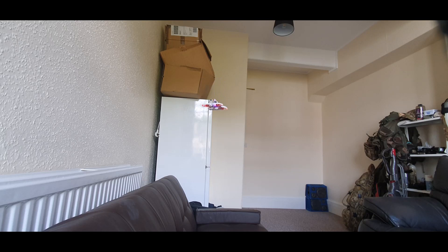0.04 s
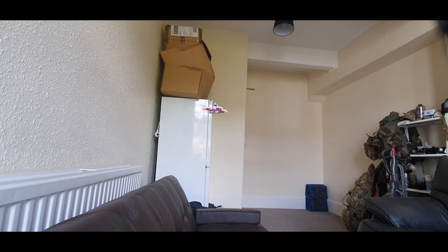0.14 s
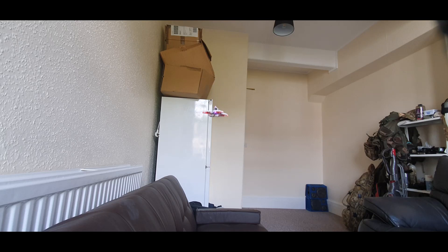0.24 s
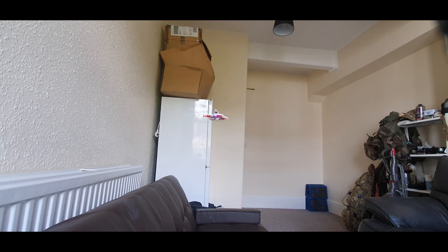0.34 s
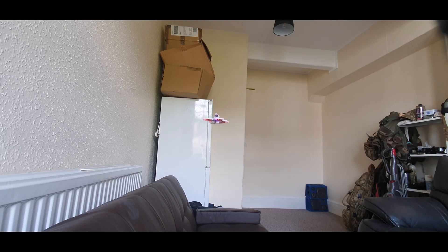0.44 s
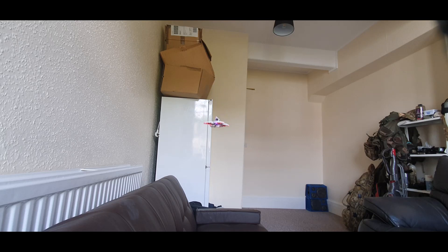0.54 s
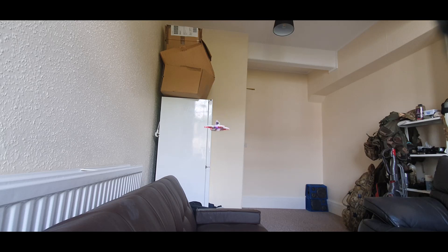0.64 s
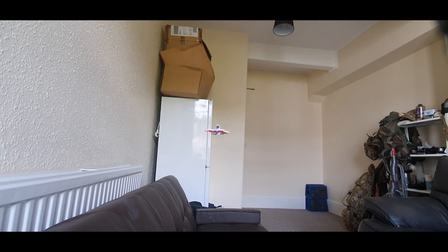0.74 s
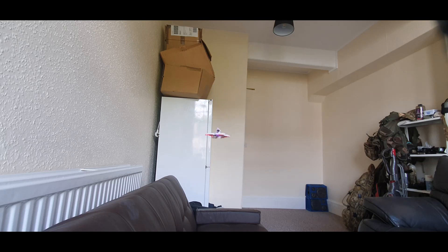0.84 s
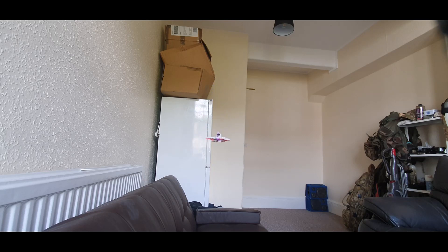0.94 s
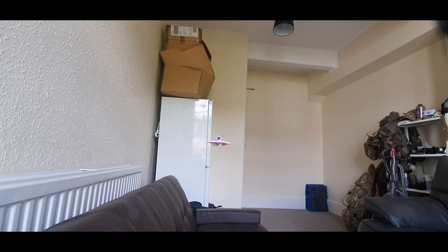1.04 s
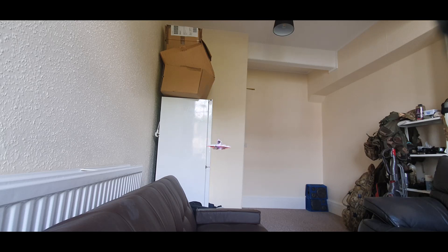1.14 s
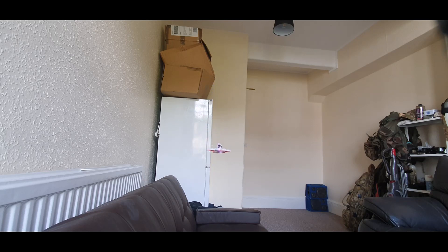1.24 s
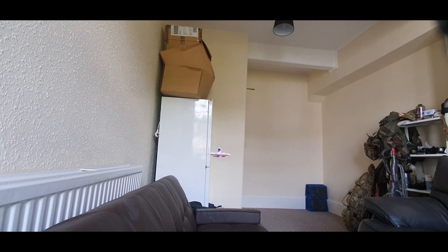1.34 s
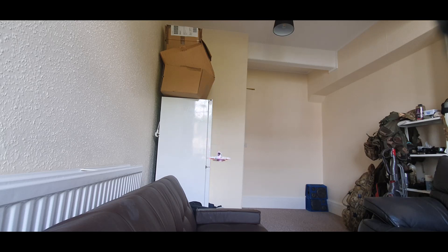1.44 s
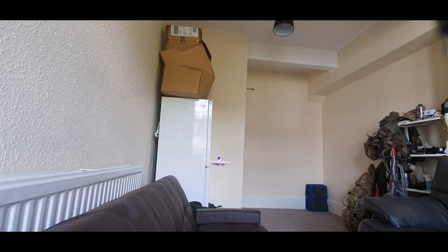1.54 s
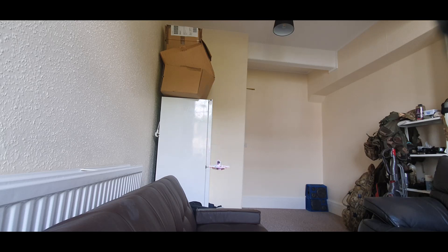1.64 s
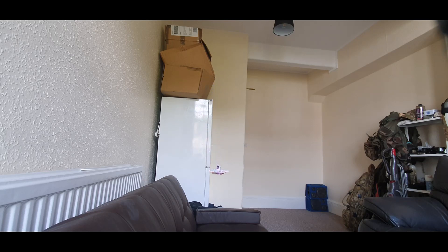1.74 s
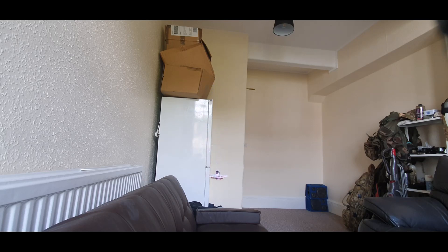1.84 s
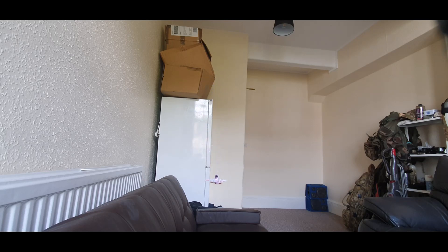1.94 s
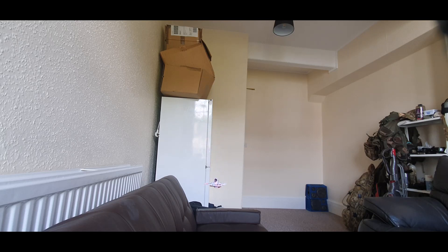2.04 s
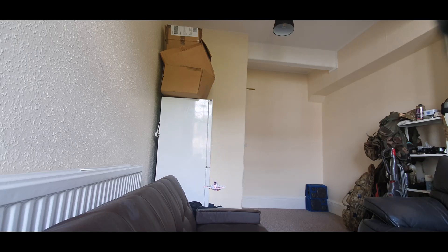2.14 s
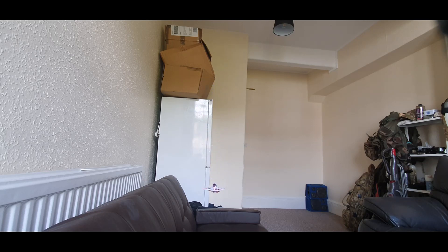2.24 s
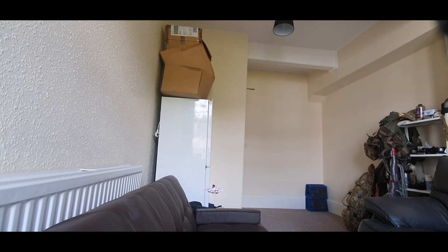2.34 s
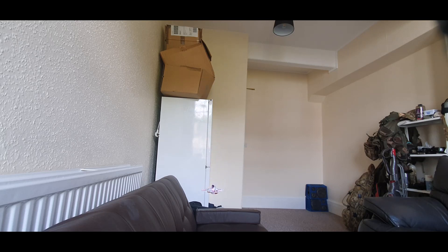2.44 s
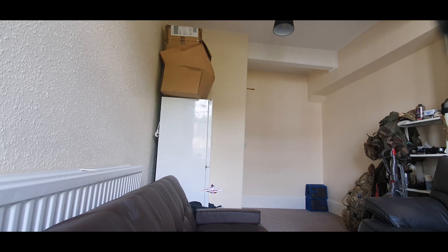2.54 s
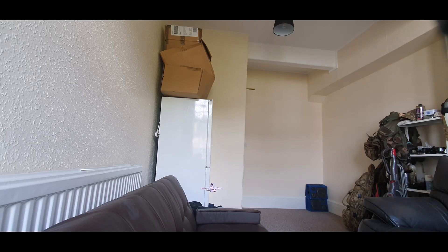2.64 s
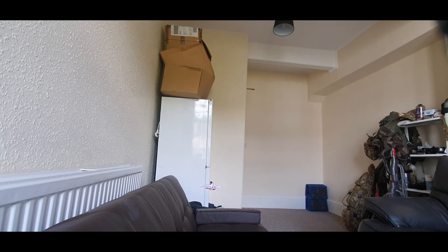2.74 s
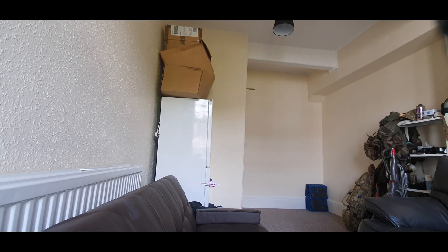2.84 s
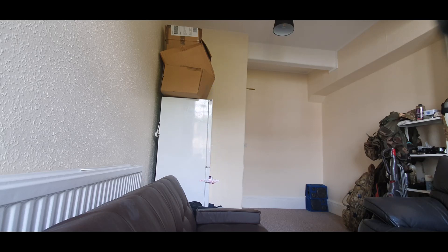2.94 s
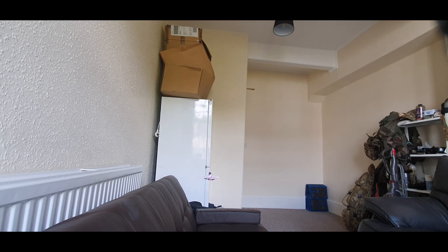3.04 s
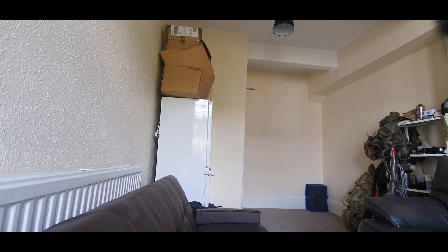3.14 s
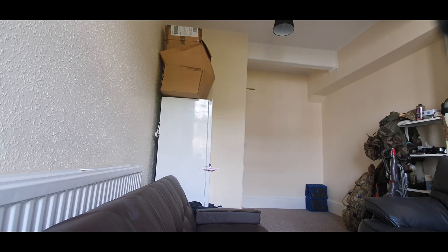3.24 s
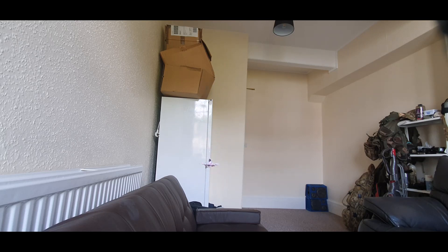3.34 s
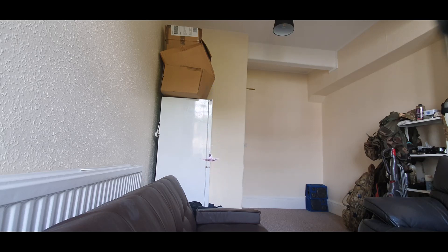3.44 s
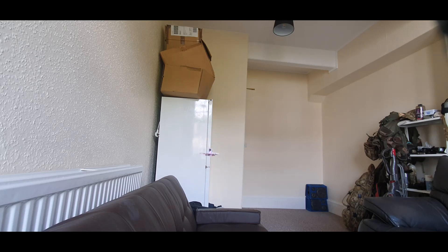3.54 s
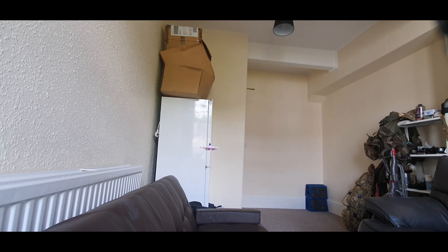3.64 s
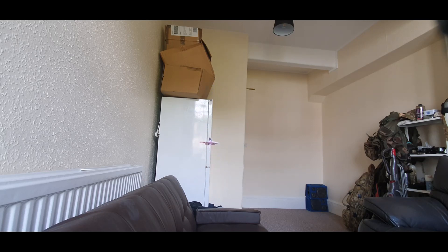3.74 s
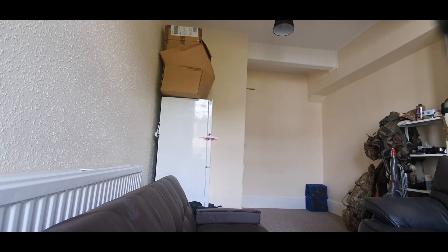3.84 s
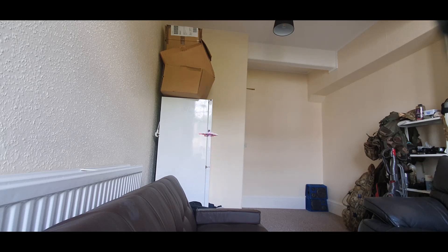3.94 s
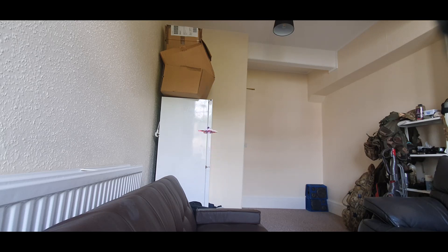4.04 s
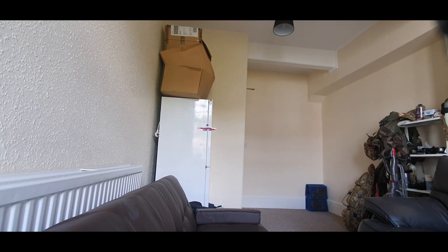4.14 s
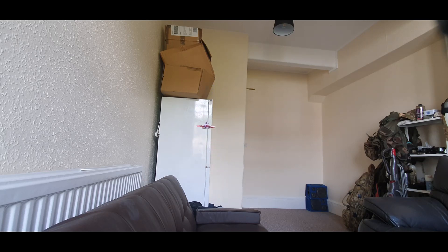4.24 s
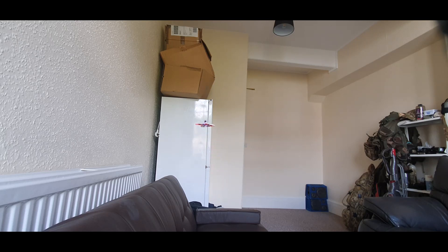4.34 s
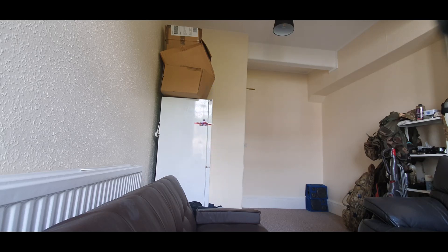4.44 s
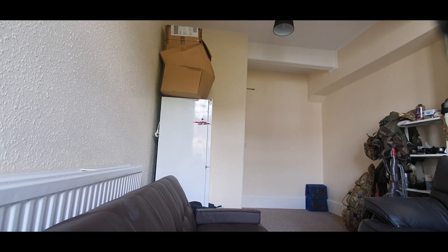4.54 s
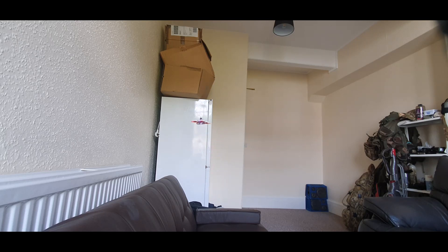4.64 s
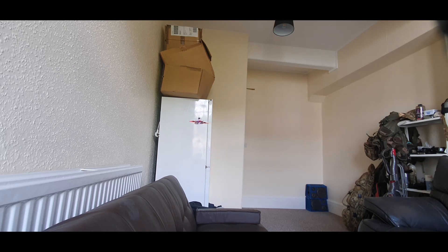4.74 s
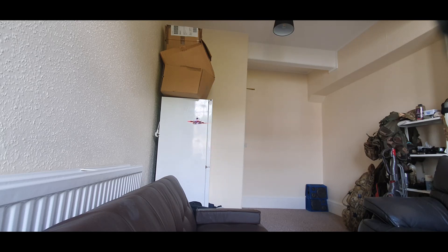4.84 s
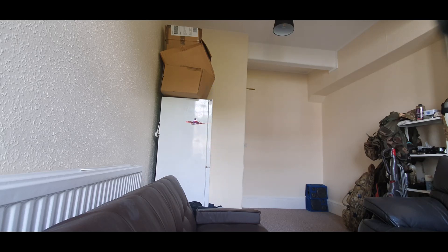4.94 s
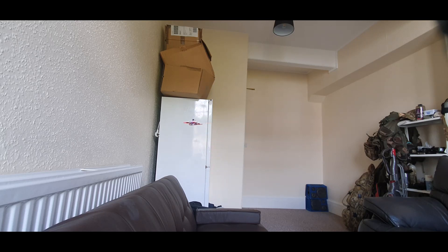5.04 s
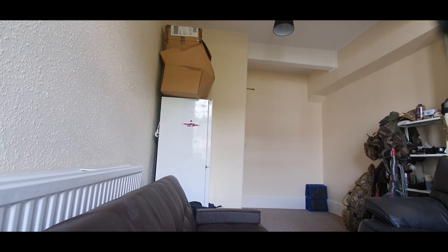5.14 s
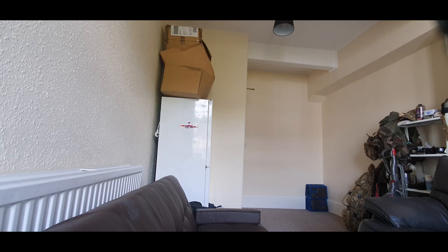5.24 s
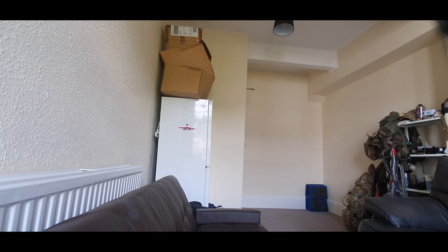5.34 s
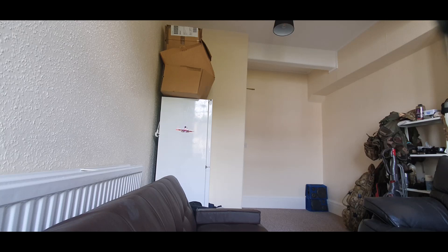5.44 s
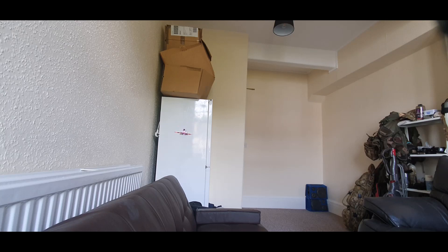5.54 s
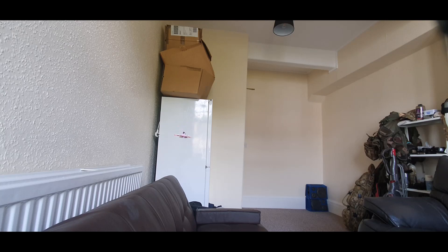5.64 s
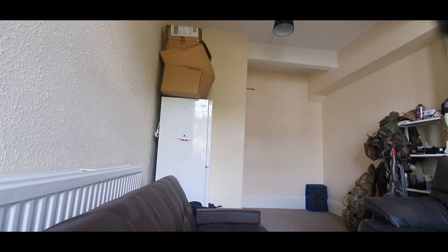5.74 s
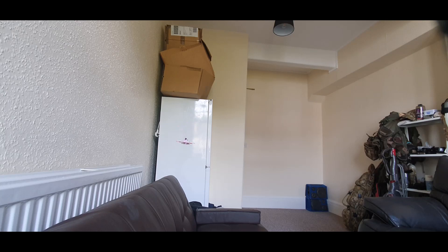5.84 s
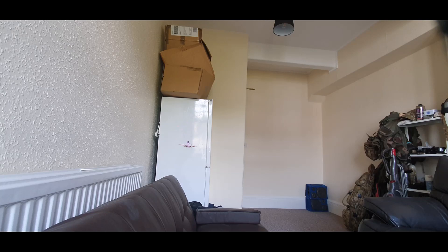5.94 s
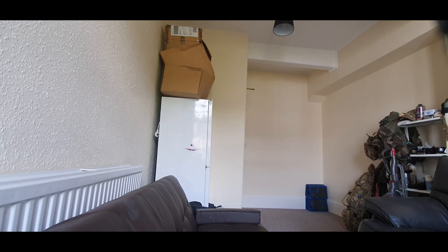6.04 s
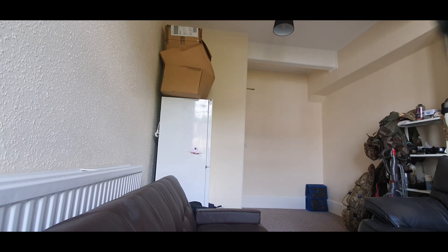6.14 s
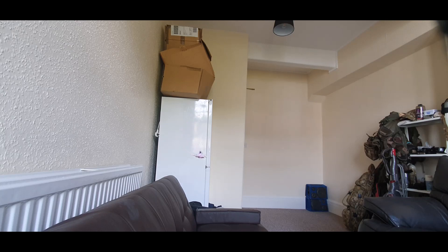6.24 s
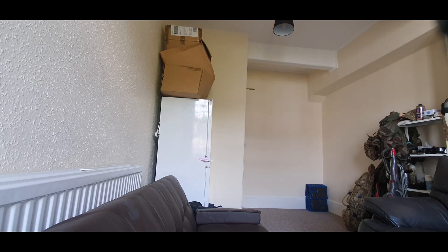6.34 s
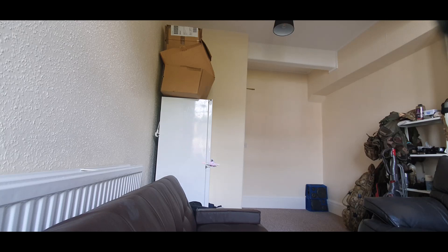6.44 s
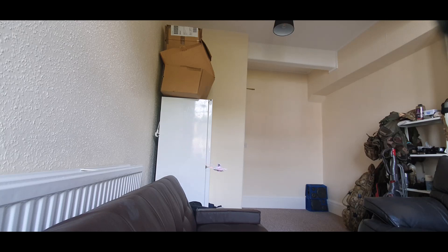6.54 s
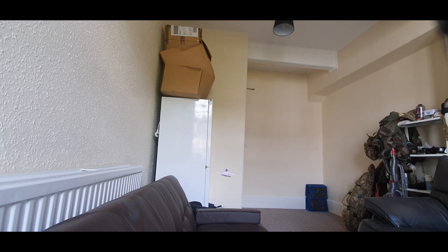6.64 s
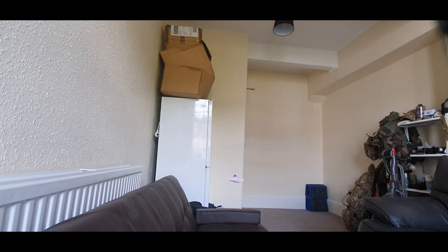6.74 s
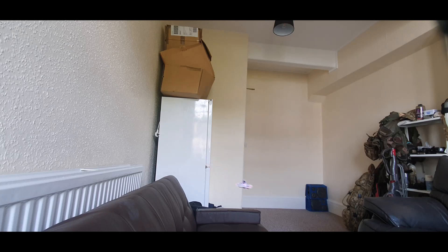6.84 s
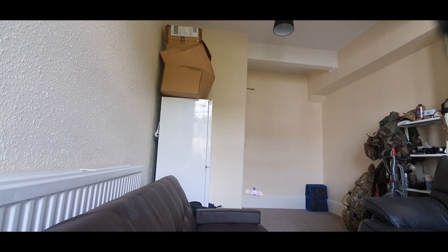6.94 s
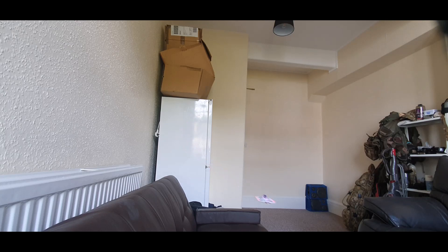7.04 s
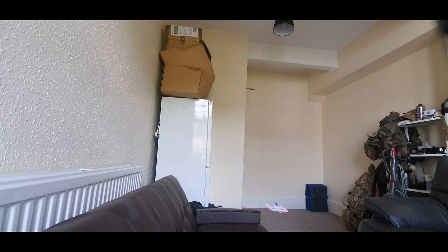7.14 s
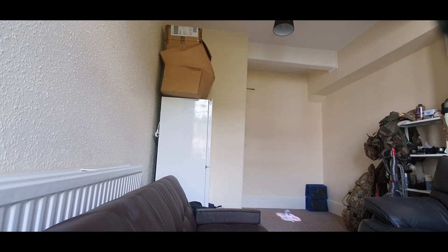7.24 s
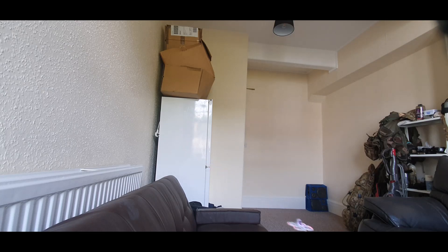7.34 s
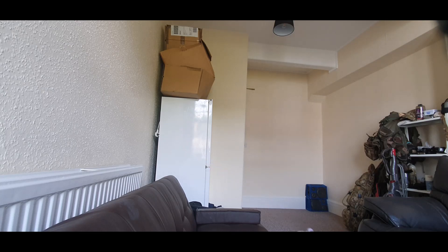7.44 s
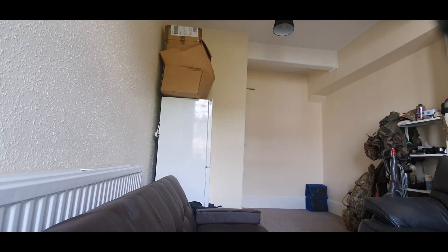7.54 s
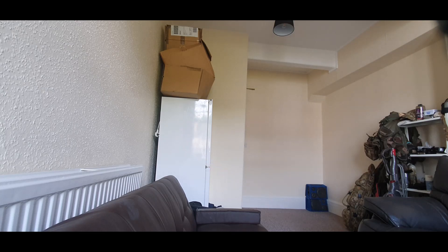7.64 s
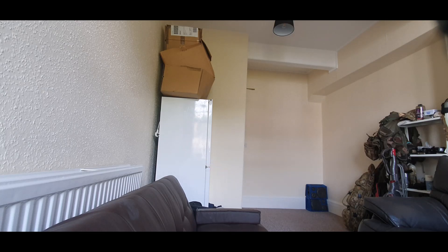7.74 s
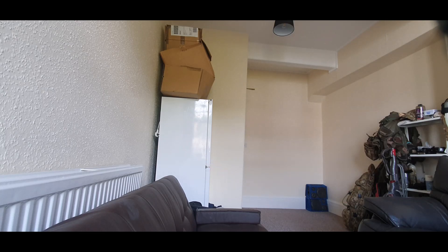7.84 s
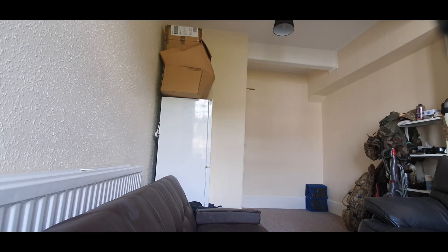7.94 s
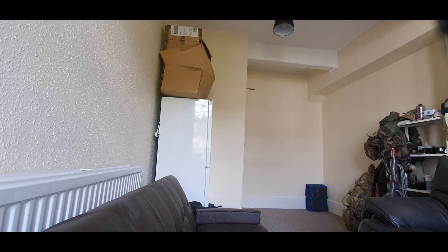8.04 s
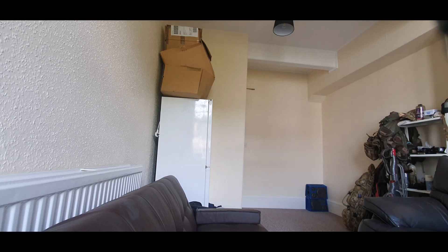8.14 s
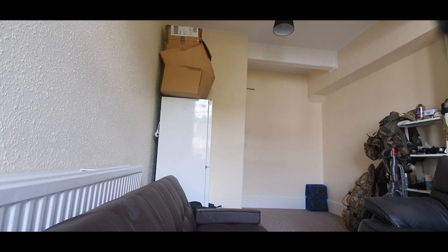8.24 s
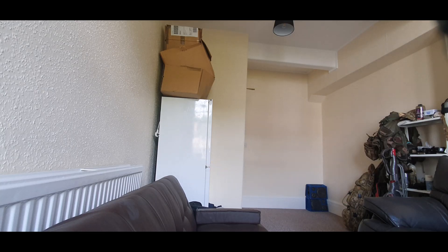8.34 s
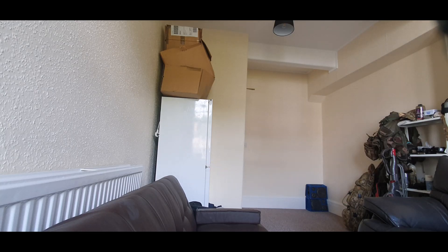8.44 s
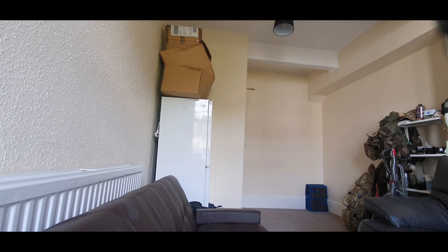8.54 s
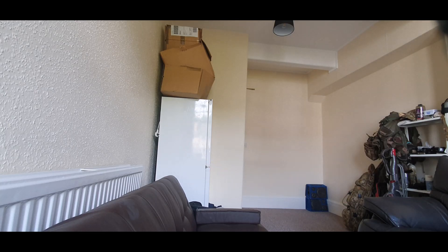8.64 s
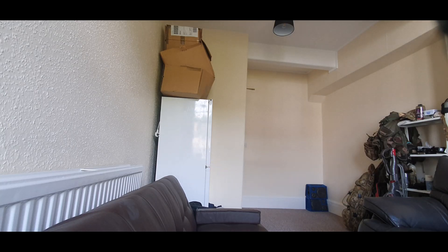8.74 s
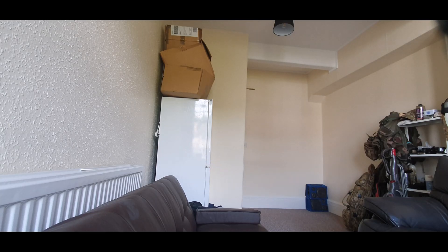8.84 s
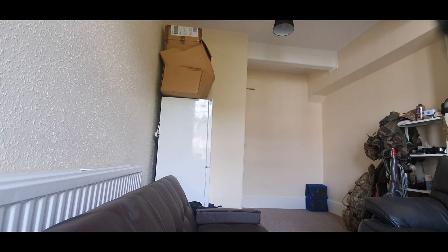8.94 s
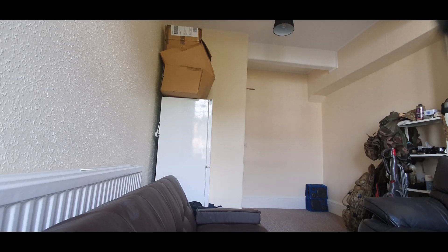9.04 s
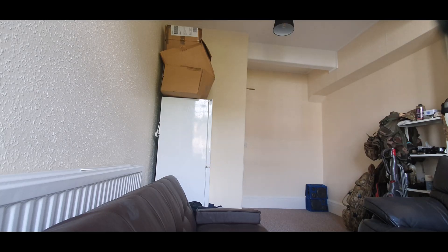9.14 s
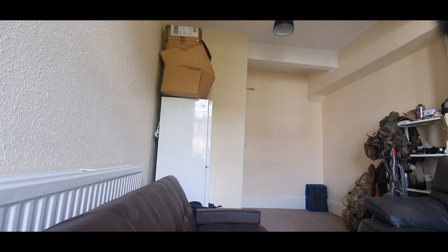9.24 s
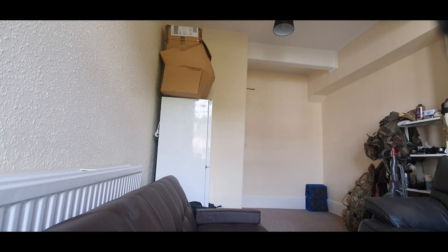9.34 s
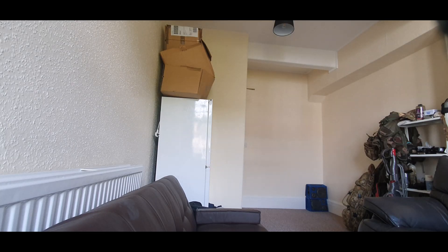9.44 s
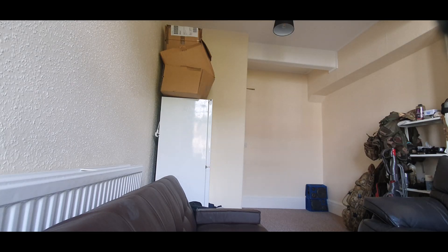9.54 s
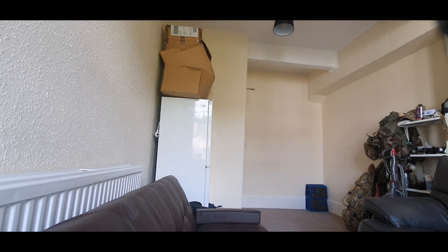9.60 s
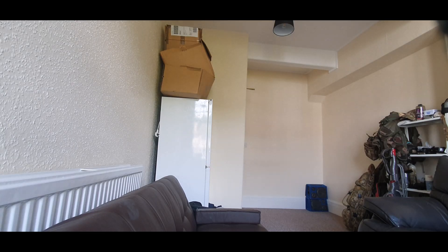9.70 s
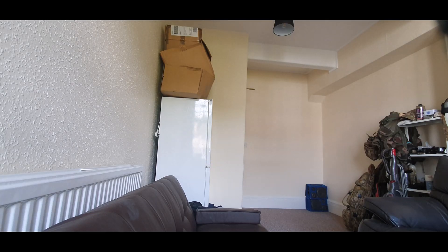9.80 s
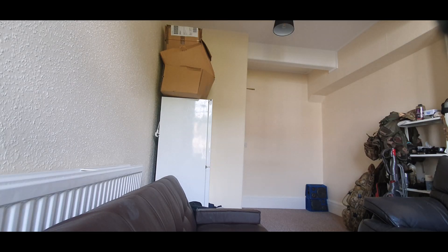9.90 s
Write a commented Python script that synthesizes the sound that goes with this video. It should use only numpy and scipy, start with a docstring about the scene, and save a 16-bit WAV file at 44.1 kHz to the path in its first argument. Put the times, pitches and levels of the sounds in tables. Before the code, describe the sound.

A palm-sized quadcopter hovers in a small room, its propellers making a high, wavering whine over an airy hiss and a thin motor whistle. Faint low booms sit underneath. Near the end the power cuts: the blades rasp and slow, two dull bumps sound and a dry bearing squeals. The plastic frame then clacks onto the floor with a brief rattle. The craft sounds a little stronger on the left.

```python
"""A palm-sized quadcopter hovers in a small room. Four brushed motors spin four-blade propellers, which
whine at shifting speeds over the hiss of chopped air and sparking brushes. The power is cut: the blades
rasp and slow down, a dry bearing squeals, and the plastic frame clacks onto the floor. Underneath, the
room's deepest notes boom softly, with two dull bumps near the end. The right microphone is shaded, so the
craft sounds weaker there."""
import sys
import numpy as np
from scipy import signal
from scipy.fft import rfft, irfft
from scipy.io import wavfile
from scipy.ndimage import uniform_filter1d

SR = 44100
rng = np.random.default_rng(int(sys.argv[2]) if len(sys.argv) > 2 else 0)


def master_out(mix):
    """Clip the mix to full scale and print it as 16-bit PCM to the path in sys.argv[1]."""
    frames = np.transpose(np.atleast_2d(mix))
    ceiling = np.clip(frames, -1, 1)
    pcm = np.round(ceiling * 32767).astype(np.int16)
    wavfile.write(sys.argv[1], SR, pcm)


N = 439677
T = np.arange(N) / SR
ROOM_T60_S, ROOM_TREBLE_T60_S = 0.36, 0.4  # a "t60" is the time a sound takes to fade by 60 dB
HOVER_HZ = 357.3  # rotor turns per second that hold the craft up
CUT_S, SPIN_DOWN_S = 8.5, 0.16  # when the power is cut; time scale of the slowing
# The frame hits the floor and rattles. Each row: start in seconds, relative level in dB.
CLACKS = [(9.3065, -5), (9.3098, 3.5), (9.3135, -7), (9.326, -14), (9.343, -9), (9.371, -15), (9.394, -15)]


def undb(db):
    """Turn decibels into a factor to multiply by."""
    return 10 ** (np.asarray(db) / 20)


def unit(x):
    """Scale a signal to an average power of 1."""
    return x / np.sqrt(np.mean(x ** 2))


def curves(table):
    """Join a table's points with straight lines in time: one curve for each column after the first."""
    times, *columns = np.transpose(table)
    return [np.interp(T, times, column) for column in columns]


def colour(x, points):
    """Filter a sound. Each row of points: frequency in Hz, gain in dB."""
    hz, db = np.transpose(points)
    size = 8192
    grid = np.maximum(np.arange(size // 2 + 1) * SR / size, 1)
    cepstrum = irfft(np.log(undb(np.interp(np.log(grid), np.log(hz), db))))
    # this folding makes the filter ring only after a sound, never before it
    cepstrum[1:size // 2] *= 2
    cepstrum[size // 2 + 1:] = 0
    return signal.fftconvolve(x, irfft(np.exp(rfft(cepstrum)))[None], axes=1)[:, :N]


def walk(rate):
    """A smooth random wobble, about 1 in size, that changes rate times a second."""
    hold = max(int(SR / rate), 1)
    steps = np.repeat(rng.standard_normal(N // hold + 1), hold)
    return unit(uniform_filter1d(uniform_filter1d(steps, hold), hold)[:N])


def fade(start, t60):
    """Switch on at start, then die away."""
    return (T >= start) * np.exp(-np.log(1000) * np.maximum(T - start, 0) / t60)


def swell(start, length, attack, t60):
    """Rise, hold until length seconds after the start, then die away."""
    rise = np.clip((T - start) / attack, 0, 1)
    return rise * np.exp(-np.log(1000) * np.maximum(T - start - length, 0) / t60)


def turn(hz):
    """The angle of something that turns hz times a second."""
    return 2 * np.pi * (np.cumsum(hz) / SR + rng.random())


def tones(angle, orders):
    """Add up tones at whole multiples of a turning rate."""
    grid = np.linspace(0, 2 * np.pi, 4096)
    wave = sum(undb(db) * np.sin(round(k) * grid + 2 * np.pi * rng.random()) for k, db in orders)
    return np.interp(angle % (2 * np.pi), grid, wave)


def steady(x, span):
    """Even out the loudness over span seconds, keeping the faster throbbing."""
    power = uniform_filter1d(x ** 2, max(int(span * SR), 1), axis=1)
    return x / np.sqrt(np.maximum(power, 0) + np.mean(power) / 1000)


def echo_tails(count):
    """The walls' echoes from count places, as fading noise; both microphones get the same bass."""
    t = T[:int(.4 * SR)]
    noise = rng.standard_normal((count, 2, len(t)))
    bass = signal.sosfilt(signal.butter(1, 400, fs=SR, output="sos"), noise)
    noise[:, 1] += bass[:, 0] - bass[:, 1]
    low = signal.sosfilt(signal.butter(1, 4000, fs=SR, output="sos"), noise)
    tail = low * undb(-60 * t / ROOM_T60_S) + (noise - low) * undb(-60 * t / ROOM_TREBLE_T60_S)
    tail *= t > .003
    return tail / np.sqrt(np.sum(tail ** 2, axis=2, keepdims=True))


def room(x, direct_db, size=16384):
    """The direct sound plus echoes that change as the craft drifts from place to place."""
    count = N // size + 2
    padded = np.pad(x, (size, count * size - N), mode="reflect")
    pieces = np.array([padded[k * size:(k + 2) * size] for k in range(count)])
    pieces = (pieces * signal.windows.cosine(2 * size)).astype(np.float32)
    echoes = signal.fftconvolve(pieces[:, None], echo_tails(count).astype(np.float32), axes=2)
    wet = np.zeros((2, count * size + echoes.shape[2]))
    for k, echo in enumerate(echoes):
        wet[:, k * size:k * size + echo.shape[1]] += echo
    return (undb(direct_db) * x + wet[:, size:size + N]) / np.sqrt(1 + undb(2 * direct_db))


def rotor_speeds(climb_hz=14.5, climb_from_s=1.79, climb_to_s=3.57, ramp_s=.22, nudge_hz=.8):
    """Turns per second of the four rotors: they steer, speed up once to climb, and are slowed by drag."""
    # One diagonal pair runs faster, the other slower. Each row: time in seconds, shift each way in Hz.
    yaw_shifts = [(0, 40.8), (.6, 39), (1.1, 27), (1.8, 19), (2.25, 14.8), (3.0, 17.3), (3.2, 29.8),
                  (3.45, 33), (3.85, 21.5), (4.85, 24.8), (5.4, 34.8), (6.1, 36.5), (6.6, 27.6), (6.8, 34),
                  (7.2, 25.3), (7.6, 30), (8.0, 18.5), (8.45, 22.3)]
    # Steering parts the two rotors of a pair.
    # Each row: time in seconds, shift each way in Hz for the fast pair, then for the slow pair.
    lean_shifts = [(0, 2, 1.3), (.5, 7, 1.5), (1.2, 4.5, 4.5), (1.65, 6, 10.4), (2.1, 2.4, 3.8),
                   (3.15, .7, 4), (3.6, 2.3, 8.5), (4.1, .5, 6.2), (4.55, 5.4, 8.3), (5.2, 5.3, 1.8),
                   (5.6, .4, 5.5), (6.25, 8.7, 15.3), (6.75, 6, 12.6), (7.15, 10.3, 7), (7.6, 13, 11.8),
                   (8.1, 7.7, 7)]
    # One exponent for each rotor: the bigger it is, the sooner the rotor slows.
    drags = [.3, .33, .4, .45]
    climb = np.clip(np.minimum(T - climb_from_s, climb_to_s + ramp_s - T) / ramp_s, 0, 1)
    (yaw,), (fast_lean, slow_lean) = curves(yaw_shifts), curves(lean_shifts)
    middle = np.sqrt((HOVER_HZ + climb_hz * climb) ** 2 - yaw ** 2)  # yaw leaves the total lift alone
    fast, slow = middle + yaw, middle - yaw
    driven = [fast + fast_lean, fast - fast_lean, slow + slow_lean, slow - slow_lean]
    slowing = 1 + np.maximum(T - CUT_S, 0) / SPIN_DOWN_S
    return [(hz + nudge_hz * walk(9)) / slowing ** drag for hz, drag in zip(driven, drags)]


def motor_whistle(hz, angle, whistle_db, chatter_db=3.5):
    """A motor's high tones sizzle and chatter, loudest near the pitch at which its metal case rings."""
    # The whistle and its two neighbours. Each row: multiple of the turning rate, relative level in dB.
    orders = [(35, -9), (36, 3.5), (37, -1)]
    # How the case rings. Each row: frequency in Hz, gain in dB.
    case = [(7000, -25), (10500, -18), (11050, 2), (11400, 1.5), (11720, -2), (12050, -19.5), (14500, -7)]
    # The whistle is most piercing at the start. Each row: time in seconds, gain in dB.
    levels = [(0, 5), (.8, 1), (1.3, -3), (4, -4), (5.4, 2), (7.8, -0.5), (8.5, 2)]
    shake = 0.45 * walk(700) + .75 * walk(160)  # radians
    chatter = undb(chatter_db * walk(22))
    whistle = sum(undb(db + np.interp(k * hz, *np.transpose(case))) * np.sin(round(k) * angle + shake)
                  for k, db in orders)
    return whistle * chatter * undb(whistle_db + curves(levels)[0])


def rotor(hz, build, nudge=.0035, turbulence=0.00257, stall_roughness=11, flex_rad=.04, tilt_db=2.5):
    """One four-blade rotor: blade tone, its octave, overtones, whistle, off-balance hum and hiss."""
    # The rotor's other overtones. Each row: multiple of the turning rate, relative level in dB.
    overtones = [(2, -32.5), (3, -24.5), (5, -21), (6, -19.5), (7, -19), (10, -11.5), (12, -8.5), (14, -19),
                 (16, -8), (20, -9), (24, -22.5), (30, -22.5), (32, -20), (36, -19.5)]
    # The rasp of blades and motor contacts. Each row: multiple of the turning rate, relative level in dB.
    rasp = [(8, -15), (10, -28), (12, -7.5), (16, -19), (20, -16), (24, -10), (30, -19), (32, -12),
            (36, -12)]
    upper_db, hum_db, whistle_db = build
    # motor nudges and rough air shake the speed, far more once the blades stall
    stall = np.interp(T, [CUT_S, CUT_S + SPIN_DOWN_S / 2], [1, stall_roughness])
    angle = turn(hz * (1 + stall * (nudge * walk(45) + turbulence * walk(500))))
    blade, octave = np.sin(4 * angle), np.sin(8 * angle)
    # bending blades blur the overtones, which come and go as the rotor tilts
    flexed = angle + flex_rad * walk(160)
    upper_gain = undb(upper_db + tilt_db * walk(6))
    upper = upper_gain * (tones(flexed, overtones) + walk(450) * tones(angle, rasp))
    whistle = motor_whistle(hz, angle, whistle_db)
    hiss = (1 + 0.26 * blade) * rng.standard_normal((2, N))  # each blade chops the air
    hum = undb(hum_db) * np.sin(angle + 0.53 * walk(30))
    return blade, octave, upper, whistle, hum, hiss


def blade_whine(blades, octaves):
    """The blade tones and their octaves swell and drop as the craft drifts through the room."""
    # The blade tones. Each row: time in seconds, relative level in dB of the fast pair, then the slow.
    levels = [(0.03, -33.5, -43), (0.22, -38, -42), (0.36, -34, -42), (0.52, -34.5, -43.5),
              (1.34, -38, -44), (1.4, -31.5, -39.5), (1.66, -38.5, -40.5), (1.73, -33.5, -40),
              (2.24, -34.5, -36), (2.31, -41, -37), (2.43, -34.5, -35), (2.91, -37, -36), (2.98, -31, -39),
              (3.08, -46, -41), (3.15, -30, -39), (3.27, -30, -37), (3.4, -33.5, -42), (3.59, -37, -38.5),
              (3.77, -38, -40.5), (3.84, -30, -42), (4.28, -38, -47.5), (4.49, -36.5, -41),
              (4.75, -36.5, -41.5), (4.89, -31.5, -47.5), (5.17, -35.5, -42.5), (5.42, -39, -43.5),
              (5.56, -34, -48), (5.75, -32.5, -40), (5.93, -33, -41.5), (6.07, -34.5, -39),
              (6.28, -41.5, -42.5), (6.4, -33, -40.5), (6.56, -41, -35.5), (6.65, -33, -36),
              (6.93, -35, -38), (7.05, -32, -41), (7.28, -33.5, -40), (7.47, -41.5, -40.5),
              (7.7, -35.5, -47.5), (7.91, -37.5, -39), (8.16, -41.5, -43.5), (8.25, -37, -49),
              (8.45, -39, -42.5), (8.55, -41.5, -39)]
    # The octave of each pair. Each row: time in seconds, relative level in dB.
    fast_octave = [(0.02, -40.5), (0.52, -37), (0.64, -42), (0.98, -35), (1.22, -44), (1.42, -39),
                   (1.6, -46), (1.64, -39.5), (2.06, -43), (2.24, -37), (2.88, -42.5), (3.04, -36.5),
                   (3.26, -41.5), (3.62, -36), (4.02, -40), (4.48, -37), (4.92, -42.5), (5.16, -39),
                   (6.06, -38), (6.26, -41), (7.16, -37.5), (7.3, -42), (7.48, -34.5), (7.78, -43.5),
                   (8.26, -37), (8.56, -50.0)]
    slow_octave = [(0.02, -46), (0.44, -42), (0.64, -43), (0.92, -43), (1.04, -49), (1.52, -41),
                   (1.68, -46), (1.88, -38.5), (2.2, -43.0), (2.8, -37), (2.9, -42), (3.5, -45.5),
                   (3.66, -41), (4.3, -45), (4.54, -38.5), (4.92, -40.5), (5.1, -43), (5.38, -40),
                   (5.56, -50.0), (6.0, -56), (6.12, -45), (6.36, -40.5), (7.14, -48), (7.78, -42),
                   (8.3, -48), (8.56, -37)]
    fast_db, slow_db = curves(levels)
    fast = steady(room(sum(blades[:2]), direct_db=-15.0), span=0.14) * undb(fast_db - 0.53)
    slow = steady(room(sum(blades[2:]), direct_db=-6.5), span=0.12) * undb(slow_db - 0.25)
    octave = sum(steady(room(sum(pair), direct_db=-8.5), span=0.23) * undb(curves(level)[0] + 0.15)
                 for pair, level in [(octaves[:2], fast_octave), (octaves[2:], slow_octave)])
    return fast + slow + octave


def unbalance_hum(hums):
    """Off-balance rotors shake once a turn; the room has loud and quiet spots for this hum."""
    # The hum. Each row: time in seconds, relative level in dB of the fast pair, then the slow.
    levels = [(0, -60, -65), (.6, -58, -66.5), (1, -65, -68.5), (2.5, -59.5, -69), (3.5, -60, -75.5),
              (4.6, -60.5, -61), (5.4, -57, -61.5), (6.3, -63, -70), (6.6, -71, -80), (6.95, -57, -66),
              (7.35, -56.5, -69), (7.7, -62, -71), (8, -58, -74), (8.3, -59.5, -67), (8.46, -64, -72),
              (8.6, -48, -64)]
    fast_db, slow_db = curves(levels)
    hum = unit(sum(hums[:2])) * undb(fast_db + 2.5) + unit(sum(hums[2:])) * undb(slow_db + 2.0)
    return hum * undb(0.5 * walk(10) + 2.0 * walk(70))


def air_and_brush_hiss(hisses, power):
    """Chopped air and the motors' sparking brushes hiss; without power the hiss turns dull."""
    # The tone of the hiss. Each row: frequency in Hz, gain in dB.
    shape = [(100, -26), (250, -33), (450, -21), (560, -36), (720, -17), (920, -29), (1100, -11),
             (1700, -4), (1900, -1.5), (2150, -4), (2600, 2.5), (3600, 2.5), (8600, -1), (11500, 0),
             (14300, -2), (15500, -4)]
    # Its loudness. Each row: time in seconds, relative level in dB.
    levels = [(0, -32.5), (1.05, -33.5), (1.5, -34.5), (3.3, -33.5), (6, -34.5), (7.6, -33), (8.1, -36.5),
              (8.63, -36.5), (8.75, -48.5), (9, -47.5), (9.27, -57)]
    airflow, sparks = undb(.5 * walk(25)), undb(walk(3000))
    bright = unit(colour(sum(hisses) * sparks * airflow, shape))
    dull = colour(bright, [(300, -15), (550, 29.5), (900, 12), (2000, 6), (8000, 1), (13000, -6)])
    return (power * bright + (1 - power) * dull) * undb(curves(levels)[0] + 3.0)


def low_flickering_noise(flicker_db=9, flickers_per_s=11, fade_db_per_s=0.73):
    """Faint low noise in narrow bands that flicker in and out."""
    # The bands. Each row: centre in Hz, width in Hz, relative level in dB.
    bands = [(455, 106, -66.5), (596, 56, -66.5), (720, 49, -60.5), (790, 49, -61), (907, 45, -63.5),
             (1032, 95, -62.5)]
    total = 0
    for hz, width, db in bands:
        bandpass = signal.butter(2, [hz - width / 2, hz + width / 2], "band", fs=SR, output="sos")
        noise = signal.sosfilt(bandpass, rng.standard_normal((2, N)))
        flicker = undb(flicker_db * np.minimum(walk(flickers_per_s), 1))
        total += unit(noise * flicker) * undb(db)
    return total * undb(-fade_db_per_s * T)


def flight(speeds, power_fade_s=(8.55, 8.74), no_lift_db=-24.5, db_per_octave=11):
    """A fast and a slow pair of rotors fill the room with sound until the landing stops them."""
    # One row for each rotor, fast pair first. Each row: gains in dB of overtones, hum and whistle.
    builds = [(3, 0.5, -59), (2.5, 4, -61), (-2.5, -11, -51), (-3, -11, -49.5)]
    rotors = [rotor(hz, build) for hz, build in zip(speeds, builds)]
    blades, octaves, uppers, whistles, hums, hisses = zip(*rotors)
    power = np.interp(T, power_fade_s, [1, 0])
    whine = blade_whine(blades, octaves)
    upper = room(unit(sum(uppers)) * undb(-35.0) + sum(whistles), direct_db=-8.5)
    hum = unbalance_hum(hums)
    hiss = air_and_brush_hiss(hisses, power)
    # slow blades that lift nothing lose their tone
    tone_db = no_lift_db * (1 - power) + db_per_octave * np.log2(np.mean(speeds, axis=0) / HOVER_HZ)
    stop = undb(-60 * np.maximum(T - CLACKS[0][0], 0) / ROOM_TREBLE_T60_S)
    return ((whine + upper + hum + low_flickering_noise()) * undb(tone_db) + hiss) * stop


def room_rumble(attack_s=0.055, boom_t60=0.5, bump_t60=0.13):
    """The room's two deepest notes swell in soft booms; two dull bumps set the lowest one ringing."""
    # The booms. Each row: start and length in seconds, relative dB of the lowest note, then the second.
    booms = [(0, 0.072, -68, -79), (0.286, 0.5, -58.5, -72), (.9, 0.27, -56, -68),
             (1.294, 0.44, -47.5, -65), (3.045, 0.52, -61.5, -90), (3.982, 0.11, -64, -84),
             (4.286, 0.38, -83, -70.5), (6.9, 0.74, -77, -79)]
    # The bumps. Each row: start in seconds, relative level in dB.
    bumps = [(8.583, -37), (8.765, -43)]
    # The tone of the room around each of the two notes. Each row: frequency in Hz, gain in dB.
    lowest_shape = [(20, -22), (35, -13), (50, -17), (60, -19), (65, 8), (70, -5.5), (80, -15), (135, -35),
                    (178, -16), (230, -48.5), (500, -78)]
    second_shape = [(60, -51), (140, -18.5), (178, -9), (225, -25.5), (400, -69)]
    air = rng.standard_normal(N) + undb(-10.0) * rng.standard_normal((2, N))  # nearly alike on both sides
    swells = [swell(start, length, attack_s, boom_t60) for start, length, _, _ in booms]
    lowest_gain, second_gain = undb(np.array(booms)[:, 2:]).T @ np.array(swells)
    # between booms the rumble sinks slowly to a faint, even level
    settling = undb(np.maximum(-63 - 2.5 * T, -77)) * swell(0, CUT_S, attack_s, t60=2.5)
    ringing = sum(undb(db - 4.5) * swell(start, 0.031, 0.02, boom_t60) for start, db in bumps)
    lowest = steady(colour(air, lowest_shape), span=0.18) * np.hypot(lowest_gain + ringing, settling)
    second = unit(colour(air, second_shape)) * second_gain
    thud_shape = [(25, -29), (48, -14), (65, 6), (110, -10), (190, -4), (280, -22), (1000, -38)]
    thud = unit(colour(rng.standard_normal((1, N)), thud_shape))
    thud_gain = sum(undb(db) * swell(start, 0.0079, 0.011, bump_t60) for start, db in bumps)
    return lowest * undb(-1.0) + second + thud * thud_gain


def room_noise(level_db=-67):
    """The faint, steady noise of the room."""
    # Its tone. Each row: frequency in Hz, gain in dB.
    shape = [(30, -22), (65, -5.5), (120, -15), (250, -18), (450, -14), (1000, -24.5), (1800, -13),
             (2700, -24), (4000, -19), (6500, -31), (15000, -33)]
    return unit(colour(rng.standard_normal((2, N)), shape)) * undb(level_db)


def coasting(squeal_jitter=0.015, blade_jitter=.05):
    """With the power cut, the last blades flutter and a dry bearing squeals as its rotor slows."""
    # The blade tone of the last rotor. Each row: time in seconds, pitch in Hz, level in dB.
    flutter = [(8.5, 1330, -50), (8.545, 1260, -33.5), (8.59, 1220, -54), (8.64, 1190, -47),
               (8.68, 1130, -50), (8.74, 1000, -74), (8.83, 890, -52), (8.9, 870, -64), (8.99, 850, -54),
               (9.09, 820, -70), (9.28, 800, -79), (9.36, 780, -110)]
    # The bearing. Each row: time in seconds, rubbing rate in Hz, level in dB.
    rubbing = [(8.75, 263, -70), (8.95, 258, -57), (9.02, 259.3, -50), (9.09, 230, -49), (9.15, 219, -58),
               (9.23, 203, -49), (9.3, 202, -51), (9.42, 195, -110)]
    # The tones of its squeal. Each row: multiple of the rubbing rate, relative level in dB.
    orders = [(4, -20), (12, -10), (16, -11), (36, -4)]
    rub_hz, squeal_db = curves(rubbing)
    squeal = unit(tones(turn(rub_hz * (1 + squeal_jitter * walk(400))), orders)) * undb(squeal_db)
    blade_hz, blade_db = curves(flutter)
    blades = unit(np.sin(turn(blade_hz * (1 + blade_jitter * walk(150))))) * undb(blade_db)
    return room((squeal + blades) * (T > CUT_S), direct_db=0)


def stalling(level_db=-36, grain_db=3):
    """The stalling blades tear the air in a short rasp."""
    # The tone of the rasp. Each row: frequency in Hz, gain in dB.
    shape = [(900, -29), (1700, -7), (2400, 0), (3300, -1), (5000, -16), (12000, -24)]
    grainy = rng.standard_normal((2, N)) * undb(grain_db * walk(600))
    return unit(colour(grainy, shape)) * undb(level_db) * swell(8.525, length=0.12, attack=.025, t60=.25)


def singing_frame(jitter=.008, flutter_db=3.5):
    """The rubbing bearing makes the frame sing at two high pitches."""
    # The notes. Each row: start in seconds, length in seconds, pitch in Hz, level in dB.
    notes = [(8.658, 0.05, 7240, -40.5), (8.76, 0.28, 7230, -55.5), (8.912, .03, 7340, -46),
             (9.177, 0.08, 7250, -46), (8.77, 0.37, 5160, -58.5), (9.07, 0.075, 5150, -50),
             (9.185, 0.25, 5125, -51)]
    waver, flutter = 1 + jitter * walk(450), undb(flutter_db * walk(60))
    song = sum(unit(np.sin(turn(hz * waver))) * undb(db) * swell(start, length, attack=0.035, t60=0.2)
               for start, length, hz, db in notes)
    return room(song * flutter, direct_db=0)


def landing(crack_t60=0.015):
    """The plastic frame hits the floor in a quick run of cracks, rings briefly and echoes in the room."""
    # The tone of the blow. Each row: frequency in Hz, gain in dB.
    shape = [(100, -20), (280, -16), (420, -1), (900, -0.5), (1300, -1.5), (1800, 5.5), (2800, 0),
             (4500, 2), (7500, -3.5), (10500, -1.5), (15500, -11)]
    # The frame's ringing notes. Each row: pitch in Hz, relative level in dB, t60 in seconds.
    notes = [(1803, 2, 0.43), (2620, -1, 0.38), (4260, -7, .2), (5095, -7, 0.35), (10200, -11, .15)]
    hit_s = CLACKS[1][0]  # the hardest clack
    crack = sum(undb(db) * fade(start, crack_t60) for start, db in CLACKS) * rng.standard_normal((2, N))
    echo = undb(-10) * fade(hit_s, ROOM_TREBLE_T60_S) * rng.standard_normal((2, N))
    dull_noise = colour(rng.standard_normal((2, N)), [(1800, 8.5), (6000, -5)])
    body = undb(-11) * fade(hit_s, ROOM_T60_S) * dull_noise
    ring = sum(undb(db) * np.sin(2 * np.pi * hz * T) * fade(hit_s, t60) for hz, db, t60 in notes)
    return undb(-23.0) * colour(crack + echo + body, shape) + undb(-50) * ring


def scene():
    """The craft, shaded at the right microphone, over the room's own sounds."""
    # The right microphone compared with the left. Each row: frequency in Hz, gain in dB.
    shade = [(100, -1), (380, -2.5), (500, -4.5), (600, -33), (700, -2), (800, -6), (900, -15.5),
             (1030, -2), (1500, -5.5), (3500, -7.5), (5500, -7.5), (7200, -14), (7900, -12), (8300, -47),
             (8800, -5), (9400, -2), (11300, 0), (13500, -7)]
    # The shade lessens as the craft drifts right. Each row: time in seconds, gain in dB.
    drift = [(3, -0.3), (6, -0.5), (6.8, -0.5), (8.3, 1)]
    craft = flight(rotor_speeds()) + stalling() + coasting() + singing_frame() + landing()
    right = colour(craft[1:], shade) * undb(curves(drift)[0])
    return np.vstack([craft[:1], right]) + room_rumble() + room_noise()


def record(dry):
    """The camera cuts off the highest treble, above 15750 Hz."""
    return signal.sosfilt(signal.ellip(10, .2, 70, 15750, fs=SR, output="sos"), dry)


dry = scene()
out = record(dry)
master_out(out)
```